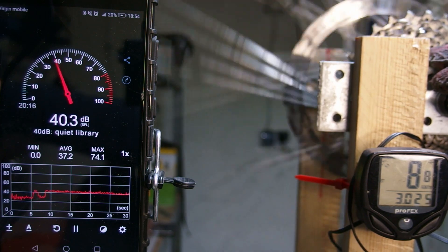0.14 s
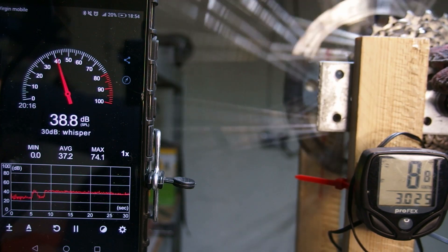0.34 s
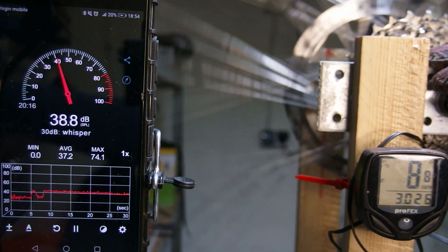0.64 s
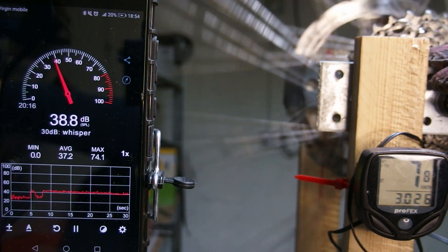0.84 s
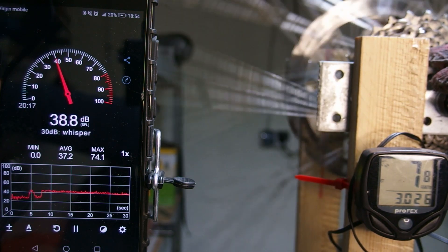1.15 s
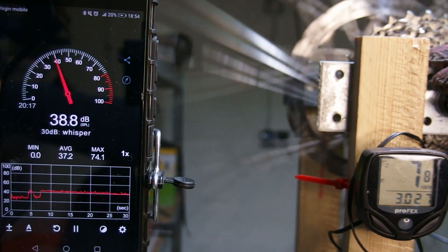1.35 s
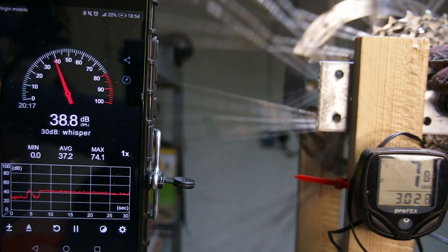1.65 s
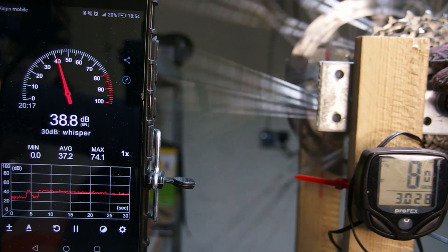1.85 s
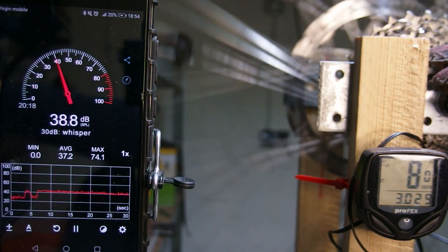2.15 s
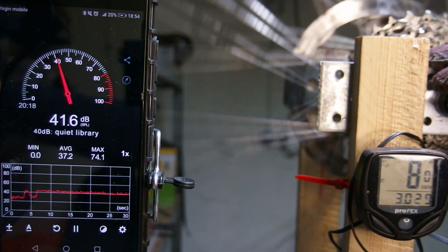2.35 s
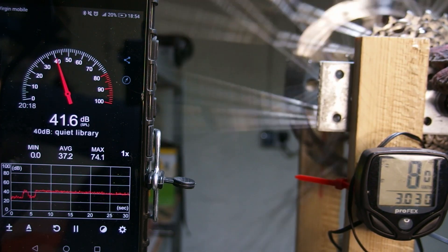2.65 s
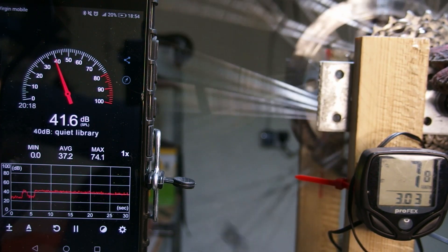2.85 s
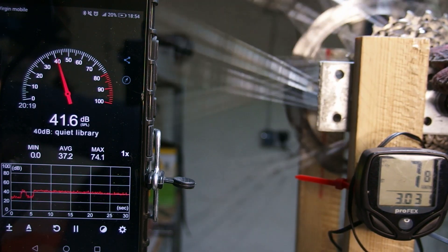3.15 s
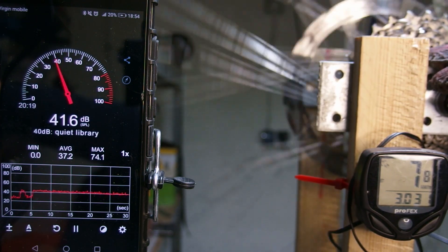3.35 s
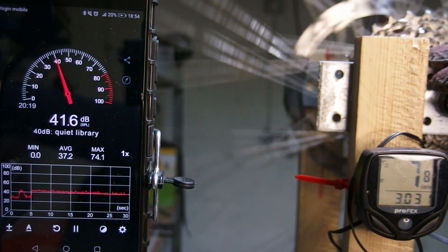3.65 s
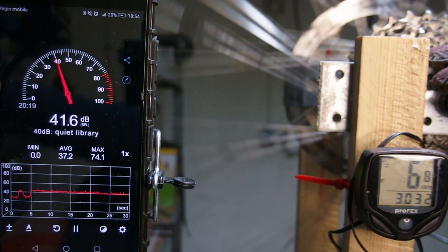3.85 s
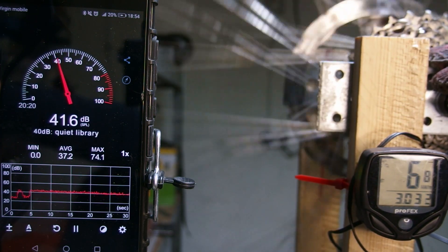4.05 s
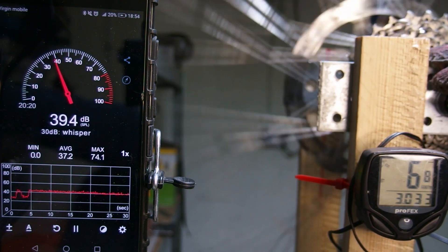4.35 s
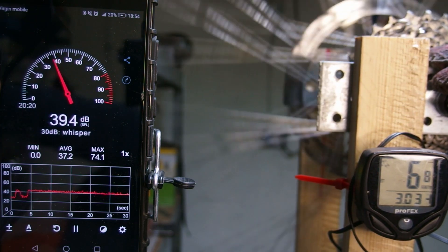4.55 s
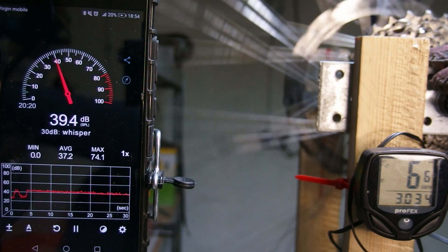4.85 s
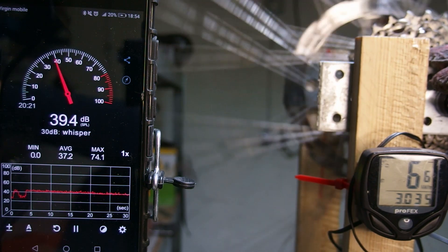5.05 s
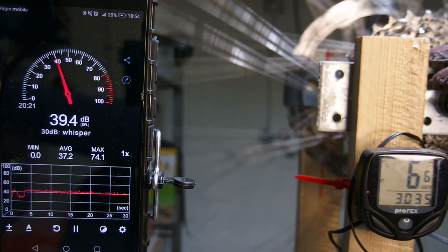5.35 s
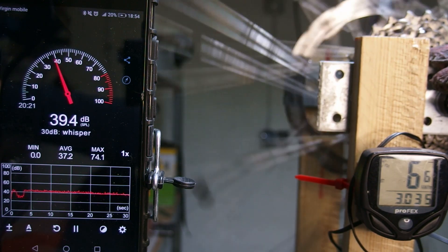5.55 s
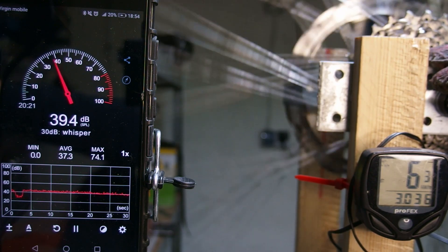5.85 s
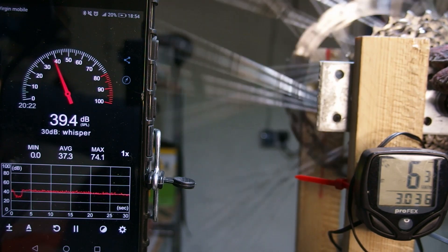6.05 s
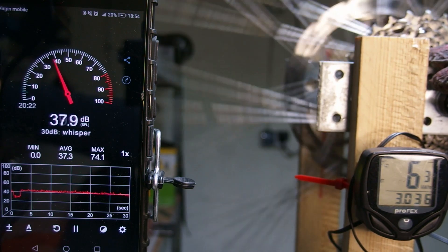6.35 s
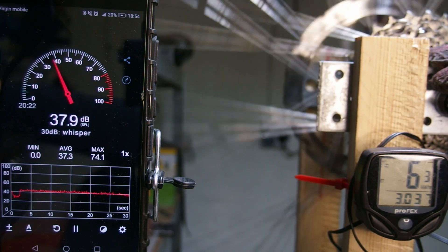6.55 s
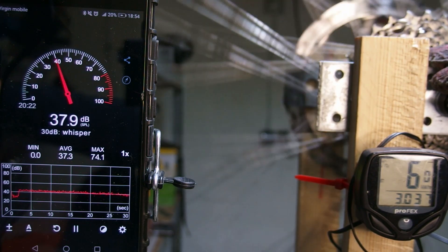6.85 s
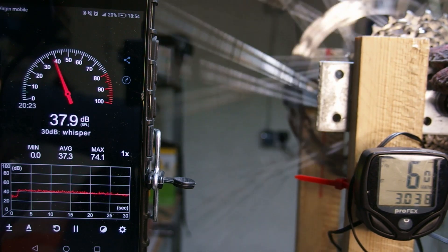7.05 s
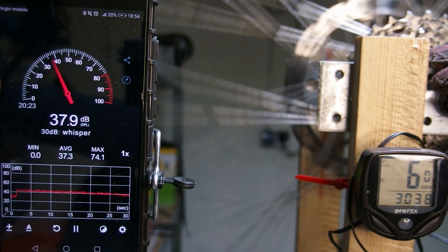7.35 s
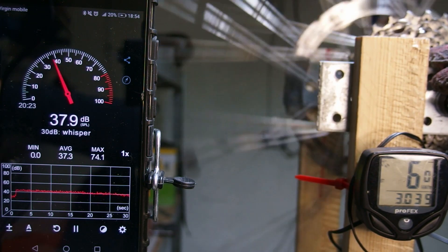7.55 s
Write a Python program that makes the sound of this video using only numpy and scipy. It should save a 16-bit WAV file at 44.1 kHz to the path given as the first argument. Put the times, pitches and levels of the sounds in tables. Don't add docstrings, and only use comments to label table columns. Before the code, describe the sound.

Dense, sharp steel ratchet clicks buzz continuously from a spinning bike hub, the gaps widening slightly as the wheel loses speed.

```python
import sys
import numpy as np
from scipy import signal
from scipy.fft import rfft, irfft
from scipy.io import wavfile
from scipy.ndimage import uniform_filter1d

SR = 44100
rng = np.random.default_rng(int(sys.argv[2]) if len(sys.argv) > 2 else 0)


def ratio_of_db(decibels):
    return 10 ** (np.asarray(decibels, float) / 20)


def wav_record(signal):
    frames = np.transpose(np.atleast_2d(signal))
    bounded = np.clip(frames, -1, 1)
    quanta = np.round(bounded * 32767).astype(np.int16)
    wavfile.write(sys.argv[1], SR, quanta)


N = 339129
SLOWING_DB_PER_S = -.5


def at_hz(points, hz, column=1):
    points = np.array(points)
    return np.interp(np.log(hz), np.log(points[:, 0]), points[:, column])


def band_pass(x, low_hz, high_hz):
    return signal.sosfilt(signal.butter(2, [low_hz, high_hz], "band", fs=SR, output="sos"), x)


# frequency in Hz, left minus right in dB.
LEFT_RIGHT_TILT = [(60, 1.5), (99, 4), (160, 1.5), (270, 2.5), (450, 0), (740, -2), (1220, -2.5),
                   (2010, -4), (3330, -6), (5500, 4.5), (9080, -5), (15000, -4.5)]


def lean(hz):
    return ratio_of_db(at_hz(LEFT_RIGHT_TILT, hz) * np.array([[.5], [-.5]]))


def place(pair, hz):
    left, right = lean(hz) * pair
    split_hz = 5200
    lag = 2 if hz < split_hz else 1 if hz < 2 * split_hz else 0
    return np.array([np.roll(left, lag), right])


# frequency in Hz, level in dB per Hz.
RUMBLE_SPECTRUM = [(20, -16), (35, -10.5), (70, -1), (130, -1.5), (215, -0.5), (330, -2), (500, -2),
                   (700, -3.5), (1000, -19), (2000, -60)]
# frequency in Hz, side minus mid in dB.
RUMBLE_WIDTH = [(60, 9), (130, 0.5), (290, -3), (640, -1.5), (1410, 3), (3100, -4), (6820, 1), (15000, -1)]


def rumble(level_db=-51.5):
    hz = np.arange(N // 2 + 1) * SR / N + 1
    mid, side = rfft(rng.standard_normal((2, N))) * ratio_of_db(at_hz(RUMBLE_SPECTRUM, hz))
    mid, side = irfft([mid, side * ratio_of_db(at_hz(RUMBLE_WIDTH, hz))], N)
    fading_db = 0.62 * SLOWING_DB_PER_S * (np.arange(N) - N / 2) / SR
    return ratio_of_db(level_db + fading_db) * lean(150) * (mid + side * [[1], [-1]]) / mid.std()


# start in seconds, frequency in Hz, level in dB, t60 in seconds.
SOFT_BUMPS = [
    (.1, 637, -51, .5),
    (.64, 693, -40, .2),
    (1.35, 687, -33, 0.11),
    (2.1, 393, -49, 0.43),
    (3.29, 775, -35, 0.17),
    (5.81, 387, -48, 0.5),
    (6.9, 236, -46, 0.38),
]


def bumps():
    out = np.zeros(N)
    for start_s, hz, level_db, t60 in SOFT_BUMPS:
        start = int(start_s * SR)
        t = np.arange(min(SR // 2, N - start)) / SR
        envelope = ratio_of_db(level_db - 60 * t / t60) * (1 - np.exp(-t / 0.0093))
        out[start:][:len(t)] += envelope * np.sin(2 * np.pi * hz * t)
    return out


# lateness in ms, rim hum in dB, bare snap in dB.
RATCHET_TEETH = [(0.093, -1, -1.5), (0.12, -1.5, -0.0), (0.2, -1.5, -0.5), (0.146, 2.0, 1.0),
                 (-0.095, 0.5, 0), (-0.059, -3, -1), (0.074, -3, 0.0), (-0.24, -0.5, -0.5),
                 (0.505, -1, -0.0), (0.73, -2.5, -1), (0.17, 1.5, -1), (-0.0077, 3.5, -1),
                 (-0.35, -2, -1.5), (-1.127, -3.5, -1), (0.041, 3, 0), (0.55, -5.5, 0), (0.586, 3, 0.5),
                 (0.453, 2, -0.5), (-0.274, -3, 0), (-0.35, -2.5, 0.5), (-0.084, -2.5, 0.5),
                 (-0.94, 0.5, -0.5), (-0.029, -1, 1.0), (-0.103, -1.5, -1)]


def landings():
    first_s, teeth_per_s = .01342, 32.37268
    braking_per_s2, easing_per_s3 = 1.284432, .021534
    t = np.linspace(0, N / SR, 2000)
    passed = teeth_per_s * t - braking_per_s2 * t ** 2 / 2 + easing_per_s3 * t ** 3 / 6
    passed = passed - np.interp(first_s, t, passed)
    number = np.arange(int(passed[-1]) + 1)
    tooth = number % len(RATCHET_TEETH)
    return np.interp(number, passed, t) + np.array(RATCHET_TEETH)[tooth, 0] / 1000, tooth


PART_CENTRES = [800, 1500, 2900, 4200, 6500]
# spokes in dB, rim in dB, shell in dB.
FAST_SEATING = [(-1, 1.5, 0.5), (-2, -3.5, 2.5), (-2.5, -5.5, 3), (-1.5, 4.5, 1), (-2, -3, 1.5),
                (-0.5, 1.5, 0), (-1.5, -3.5, 1.5), (3, -2.5, -1.5), (-2, -1, 0.5), (-0.0, -1.5, 0.5),
                (0.5, 1.5, 0), (2, -2, -2.5), (-2.5, -0.5, -2.5), (0, 0, 0.0), (-3, 2.5, 1.5), (-2, 0, 3),
                (-3.5, -0.5, -0.0), (-2, 1.0, 2), (-3.5, 1.5, -1.5), (-1.5, -5, -1), (-2.5, -0.5, 1),
                (-1.0, -2.5, -1), (1, -2, 3.5), (1.5, -2.5, -0.5)]
# spokes in dB, rim in dB, shell in dB.
SLOW_SEATING = [(0.5, -3, -0.51), (1.0, 1.5, -0.66), (0.5, -0.5, -0.0), (2, -4.5, -1.0), (-1.5, 2, 1.2),
                (3.0, -1.5, 2.1), (-1, 5.5, 0.0), (-1.5, -0.5, 0.68), (0.5, -2, -0.5), (-1.0, -2, -0.0),
                (-1.0, -2.0, 0.71), (-2.5, -1.5, -0.76), (0.5, -1, -0.84), (-3, -1, -0.97), (-5, 4, -3.4),
                (-1, -0.5, 0.85), (-2.5, 4.5, -1.1), (-1.5, -1.5, 0.5), (3.0, -0.5, 0.84), (1.5, 3.0, 1.0),
                (-0.5, -1, 0.28), (1.5, 0.5, 0.0), (-1, -1, 1.6), (0.5, 2, -2.3)]


def tooth_db(hz, contrast=1.08, snap_contrast=1.03):
    s, tooth = landings()
    _, hum, snap = np.array(RATCHET_TEETH)[tooth].T
    slowed = (s * SR / N)[:, None]
    seat = (1 - slowed) * np.array(FAST_SEATING)[tooth] + slowed * np.array(SLOW_SEATING)[tooth]
    hum_db = contrast * hum + SLOWING_DB_PER_S * (s - s.mean())
    parts_db = np.c_[hum_db, contrast * seat, snap_contrast * snap]
    weights = [np.interp(np.log(hz), np.log(PART_CENTRES), part) for part in np.eye(len(PART_CENTRES))]
    return parts_db @ weights


def pawls(lead_ms=1.189, count=4):
    spread_ms, late_db, uneven_db, fresh_db = 2.3, -3.2, 7, .3
    s, _ = landings()
    gap, luck, chance = np.moveaxis(rng.random((len(s), 3, count)), 1, 0)
    order = np.arange(count)
    late_ms = lead_ms + np.cumsum(gap * spread_ms * (order > 0), axis=1)
    at = np.minimum(s[:, None] * SR + late_ms * SR / 1000, N - 1).astype(int)
    share = ratio_of_db(late_db * 2 * order + uneven_db * 2 * luck)
    share_db = 10 * np.log10(share / share.mean(1, keepdims=True))
    return at, share_db + fresh_db * (chance.sum(1, keepdims=True) - 2) * 2


def strikes(at, gains):
    train = np.zeros(N)
    np.add.at(train, at.ravel(), gains.ravel())
    return train


def fade(power, t60):
    return signal.lfilter([1], [1, -ratio_of_db(-120 / (max(t60, 1e-4) * SR))], power + 1e-18)


# frequency in Hz, level in dB per Hz.
WHEEL_SPECTRUM = [(600, -29.5), (1000, -19), (1500, -10), (2200, -10), (2600, -12), (3000, 1), (3350, -7),
                  (4200, 2), (4700, -14.5), (5600, -18.5), (7800, -3.5), (9500, -9.5), (12000, -8.5),
                  (13500, 2.5), (15500, -7.5)]
# frequency in Hz, rise in ms, first t60 in s, room t60 in s, room level in dB.
RING_DECAY = [(800, 25, 0.3, 0.66, -3.5), (1450, 1.8, 0.082, 0.63, -4), (3050, 0.3, 0.072, 0.78, -10),
              (4260, 0.2, 0.17, 0.32, 0.5), (8100, 0.14, 0.052, 0.29, -6), (12900, 0.23, 0.019, 0.29, -9)]
# frequency in Hz, share common to left and right from 0 to 1.
STEREO_LIKENESS = [(700, 0.32), (1500, 0.45), (3000, 0.7), (5000, 0.96), (8000, 0.2), (13000, 0.16)]


def wheel_ring(at, pawl_db, level_db=-25.5, uneven_db=3.5):
    out, edges = 0, 600 * 2 ** np.arange(0, 4.9, .25)
    white = rng.standard_normal((2, 3, N))
    for k, (low, high) in enumerate(zip(edges, edges[1:])):
        hz = np.sqrt(low * high)
        rise_ms, first_t60, room_t60, room_db = [at_hz(RING_DECAY, hz, column=c) for c in (1, 2, 3, 4)]
        chance_db = uneven_db * min(1, 3500 / hz) * rng.standard_normal(at.shape)
        power = strikes(at, ratio_of_db(2 * (tooth_db(hz)[:, None] + pawl_db + chance_db)))
        swell = np.exp(-1000 / (max(rise_ms, .05) * SR))
        power = signal.lfilter([1 - swell], [1, -swell], power)
        direct = np.sqrt(fade(power, first_t60))
        earlier = ratio_of_db(18.0) * fade(np.arange(N) == 0, room_t60)
        diffuse = ratio_of_db(room_db) * np.sqrt(fade(power, room_t60) + earlier)
        shared, left, right = white[k % 2]
        alike = np.clip(at_hz(STEREO_LIKENESS, hz), 0, 1)
        noise = np.sqrt(alike) * shared + np.sqrt(1 - alike) * np.array([left, right])
        band = band_pass((direct + diffuse) * noise, low, high)
        out = out + ratio_of_db(at_hz(WHEEL_SPECTRUM, hz)) * place(band, hz)
    return ratio_of_db(level_db) * out / out.std()


def crack(at, pawl_db, low_hz, high_hz, level_db, length_ms):
    hz = np.sqrt(low_hz * high_hz)
    power = strikes(at, ratio_of_db(2 * (level_db + tooth_db(hz)[:, None] + pawl_db)))
    envelope = np.sqrt(fade(power, length_ms / 1000))
    shared, left, right = rng.standard_normal((3, N))
    pair = envelope * (shared + 0.77 * np.array([left, right]))
    return place(band_pass(pair, low_hz, high_hz), hz)


# frequency in Hz, width in Hz, gain in dB.
BODY_HUMPS = [(833, 34, -1), (1690, 42, -8.5), (2814, 610, 4.5), (3337, 317, -6), (4776, 140, -5.5),
              (7930, 740, 4.5), (9300, 520, -2), (11760, 1800, -4.5), (13550, 750, 3.5),
              (15700, 2500, -8.5)]


def body_colour(x):
    for hz, width_hz, gain_db in BODY_HUMPS:
        w, a = 2 * np.pi * hz / SR, ratio_of_db(gain_db / 2)
        k = np.tan(np.pi * width_hz / SR)
        top = [1 + k * a, -2 * np.cos(w), 1 - k * a]
        bottom = [1 + k / a, -2 * np.cos(w), 1 - k / a]
        x = signal.lfilter(top, bottom, x)
    return x


def wall(x, delay_ms=15.0, level_db=-8, top_hz=2200):
    dull = signal.sosfilt(signal.butter(2, top_hz, fs=SR, output="sos"), x[::-1])
    return ratio_of_db(level_db) * np.roll(dull, int(delay_ms * SR / 1000), axis=1)


# frequency in Hz, t60 in seconds.
CLEAR_MODES = [(770, .12), (837, .28), (975, .07), (1019, .15), (1126, .12), (1200, .1), (1275, .12),
               (1335, .1), (1528, .16), (1553, .18), (1601, .16), (1695, .13), (1971, .1), (2222, .1),
               (2820, .07), (3010, .09), (3089, .075), (3491, .12), (3551, .12), (3752, .07), (4201, .1),
               (4255, .1), (4515, .05), (4812, .12), (4992, .08), (7693, .04), (10163, .09), (10804, .05),
               (11130, .07), (13140, .03)]
CLEAR_MODE_LEVELS = [-55, -54.5, -50.5, -67, -57, -60.5, -46.5, -64, -41.5, -43, -46.5, -42, -48.5, -46.5,
                     -40.5, -40, -36, -56, -68, -38, -36, -46.5, -42.5, -43, -55, -40.5, -52.5, -49, -65,
                     -57]


def clear_modes(at, pawl_db, uneven_db=1.5, turn=0.73):
    out = np.zeros((2, N))
    for (hz, t60), level_db in zip(CLEAR_MODES, CLEAR_MODE_LEVELS):
        r, w = ratio_of_db(-60 / (t60 * SR)), 2 * np.pi * hz / SR
        chance, left, right, sign = rng.standard_normal((4,) + at.shape)
        strength_db = level_db + tooth_db(hz)[:, None] + pawl_db + uneven_db * chance
        gains = np.sign(sign) * ratio_of_db(strength_db)
        trains = np.array([strikes(at, gains * (1 + turn * face)) for face in (left, right)])
        near = np.exp(-(330 + 0.49 * hz) / SR)
        fed = signal.lfilter([1 - near, 0, near - 1], [1, -2 * near * np.cos(w), near * near], trains + 1e-18)
        ring = signal.lfilter([0, np.sin(w)], [1, -2 * r * np.cos(w), r * r], fed)
        out += place(ring, hz)
    return out


def scene():
    at, pawl_db = pawls()
    dense = wheel_ring(at, pawl_db)
    dense += crack(at, pawl_db, low_hz=2744, high_hz=4530, level_db=-17.0, length_ms=11.4)
    dense += crack(at, pawl_db, low_hz=6800, high_hz=16300, level_db=-21.5, length_ms=4.9)
    dense = body_colour(dense)
    hub = dense + wall(dense) + clear_modes(at, pawl_db)
    hub = signal.sosfilt(signal.butter(6, 720, "high", fs=SR, output="sos"), hub)
    return hub + rumble() + bumps()


# frequency in Hz, level in dB below which a band is dropped.
TREBLE_FLOOR = [(5300, -56), (6200, -55), (7800, -58), (9000, -55.5), (10200, -61), (11800, -56.5),
                (13300, -61), (15800, -57)]


def starve(x, size=256, count=4, swing_db=3.5):
    hz, _, frames = signal.stft(x, SR, nperseg=size)
    power = np.abs(frames[:, :size // 2]) ** 2
    power = power.reshape(2, -1, count, power.shape[-1]).mean((0, 2))
    power = uniform_filter1d(power, size=3, axis=1)
    bands, moments = power.shape
    growing = np.linspace(-3.4, 1.3, moments // 8 + 1)
    starved = np.repeat(rng.standard_normal(len(growing)) + growing > 0, 8)[:moments]
    swing = np.repeat(rng.standard_normal((bands, 4 * len(growing))), 2, axis=1)[:, :moments]
    floor_db = at_hz(TREBLE_FLOOR, hz[2::count][:bands, None]) + swing_db * swing
    faint = starved & (power < ratio_of_db(2 * floor_db))
    frames[:, :-1] *= ~(np.repeat(faint, count, axis=0) & (hz[:-1, None] > 5000))
    thinned = signal.istft(frames, SR, nperseg=size)[1][:, :N]
    top = signal.istft(frames * (hz[:, None] > 15600) * starved, SR, nperseg=size)[1][:, :N]
    bins = np.arange(N // 2 + 1) * SR / N
    leak = ratio_of_db(-8 - (bins - 15830) / 90) * (bins > 15830) * (bins < 16650)
    return irfft(rfft(thinned) * (bins < 15830) + leak * rfft(top), N)


def top_cut(x):
    return signal.sosfilt(signal.butter(12, 16980, fs=SR, output="sos"), x)


def record(dry):
    mix = starve(dry)
    return top_cut(mix)


dry = scene()
out = record(dry)
wav_record(out)
```